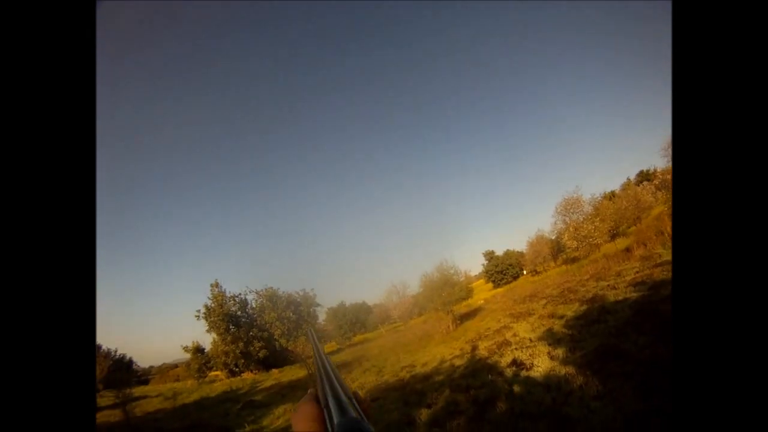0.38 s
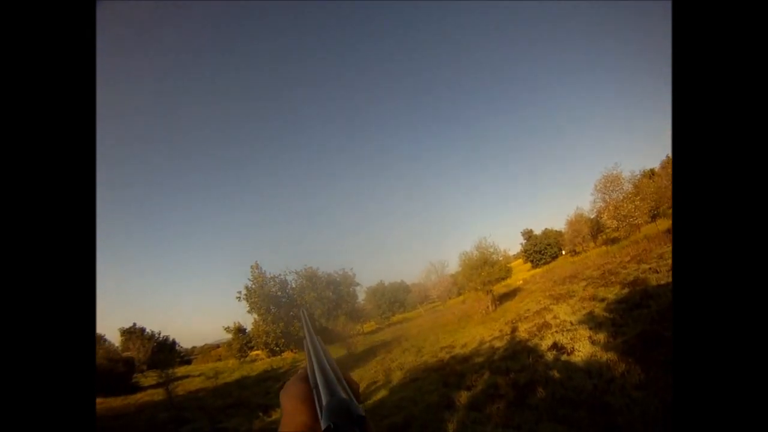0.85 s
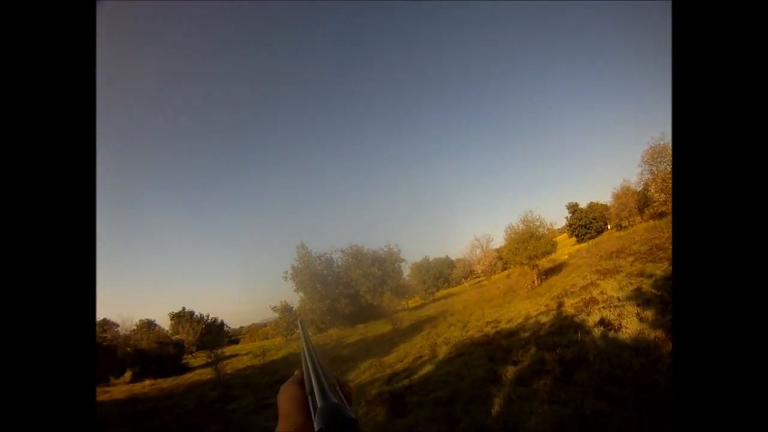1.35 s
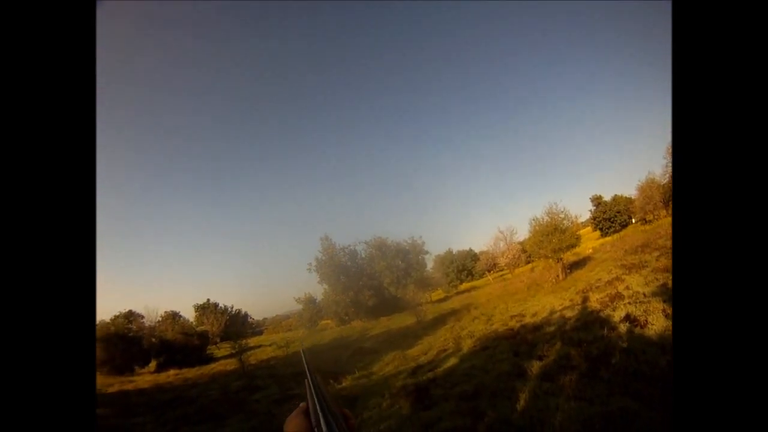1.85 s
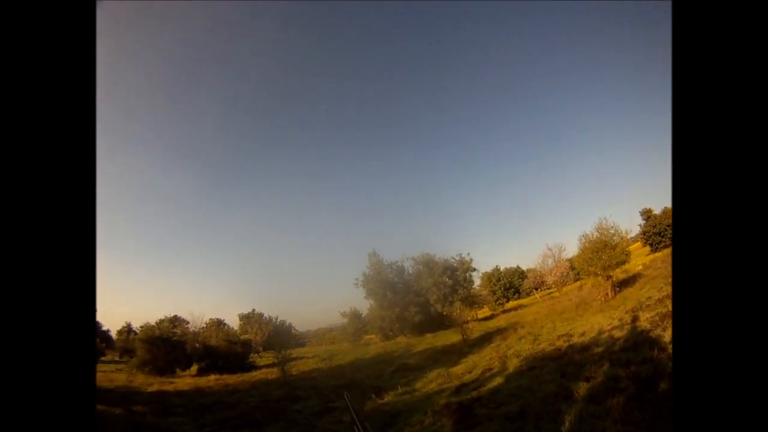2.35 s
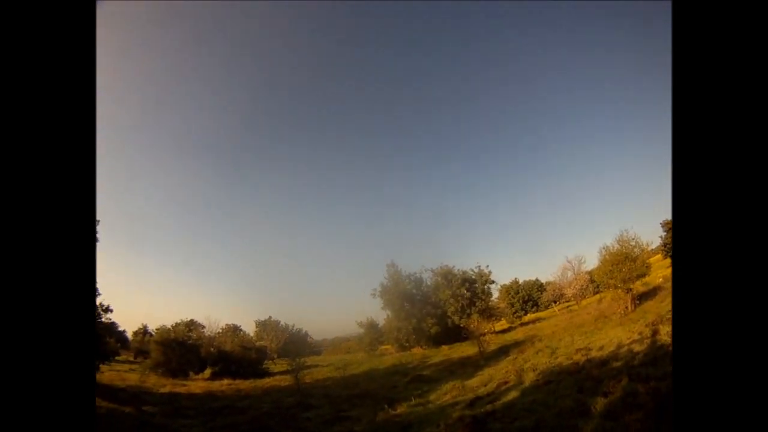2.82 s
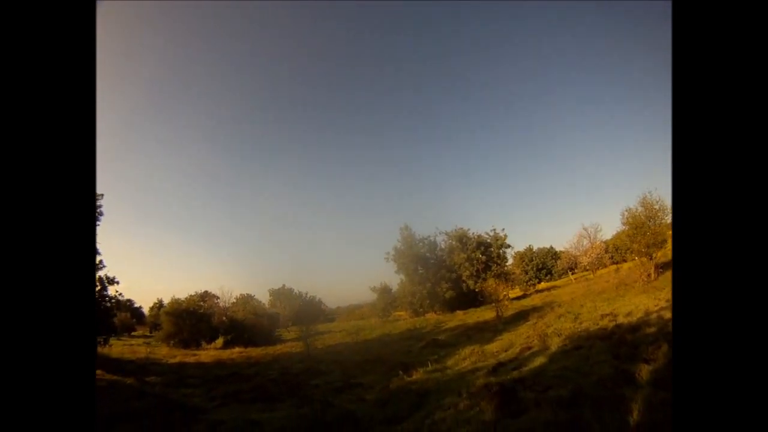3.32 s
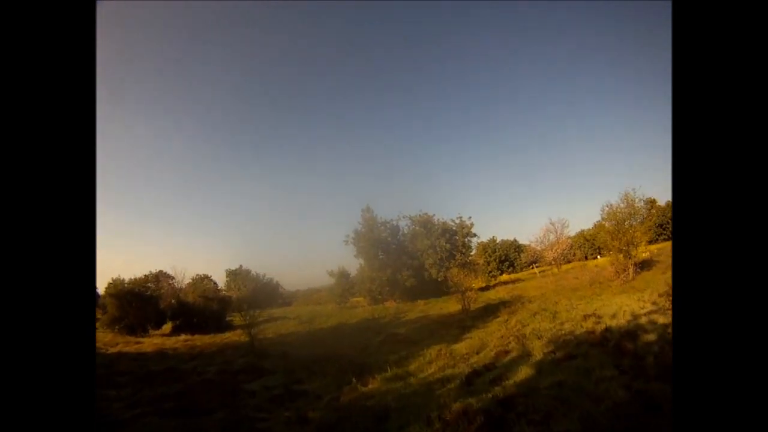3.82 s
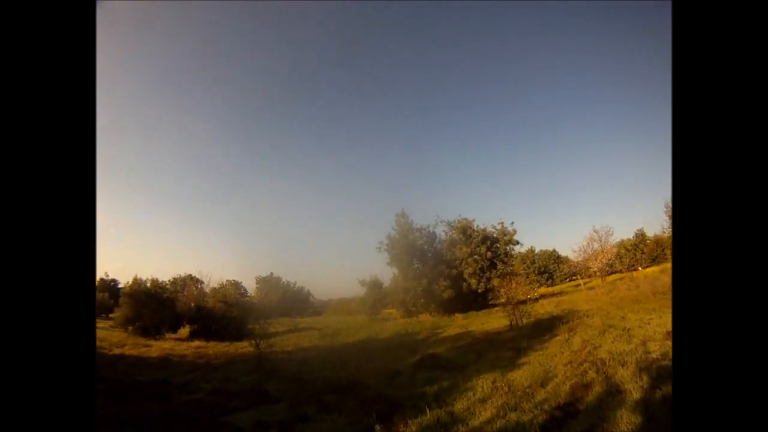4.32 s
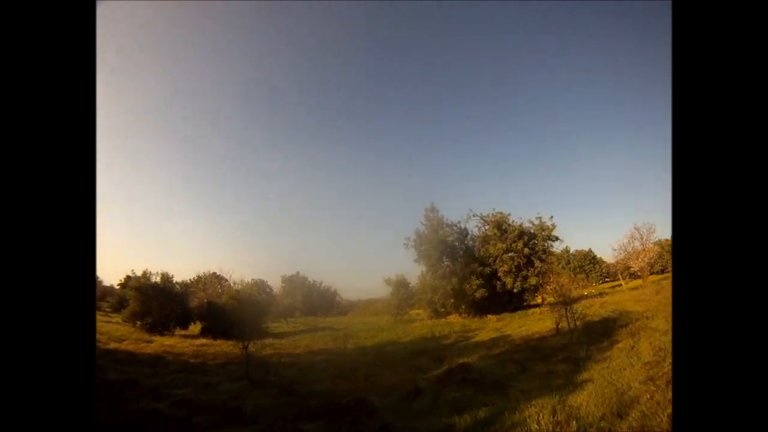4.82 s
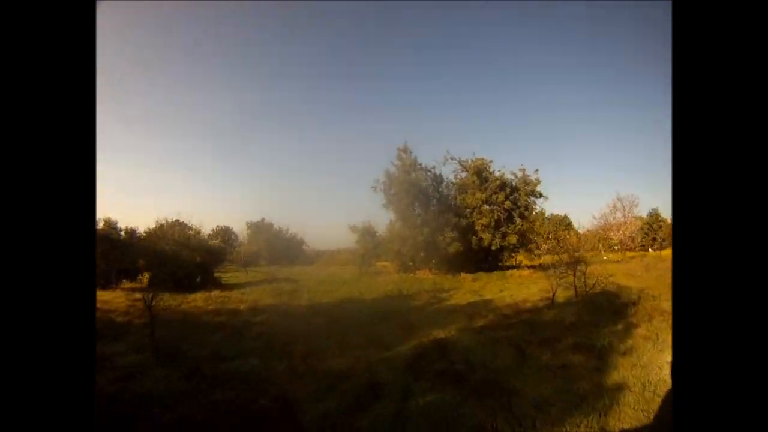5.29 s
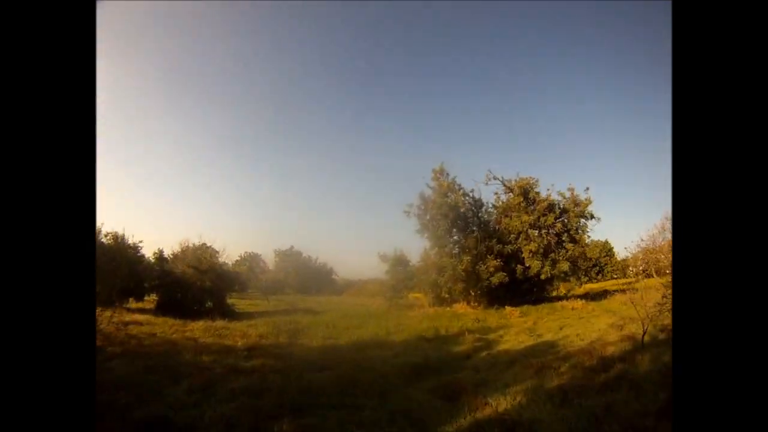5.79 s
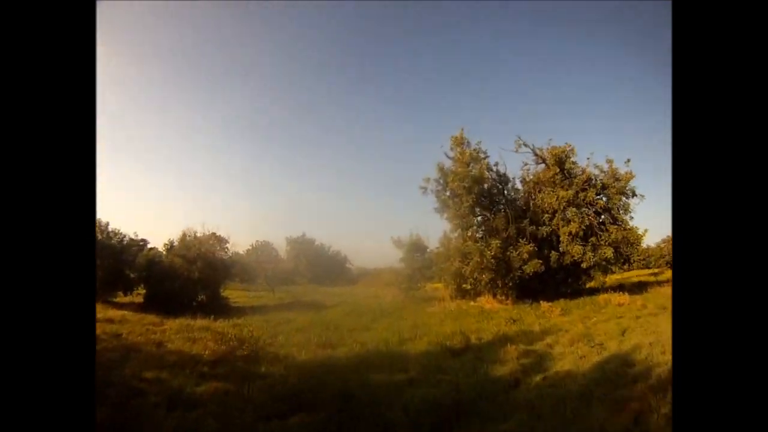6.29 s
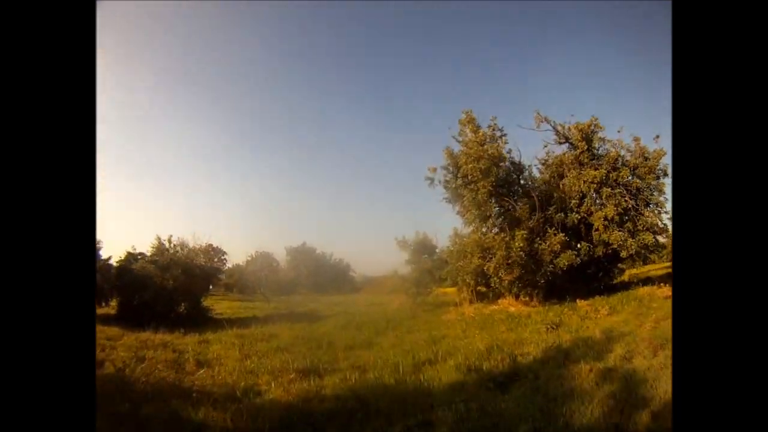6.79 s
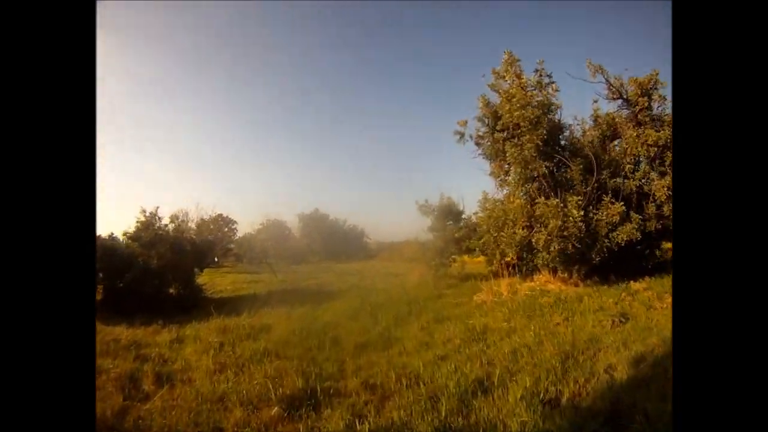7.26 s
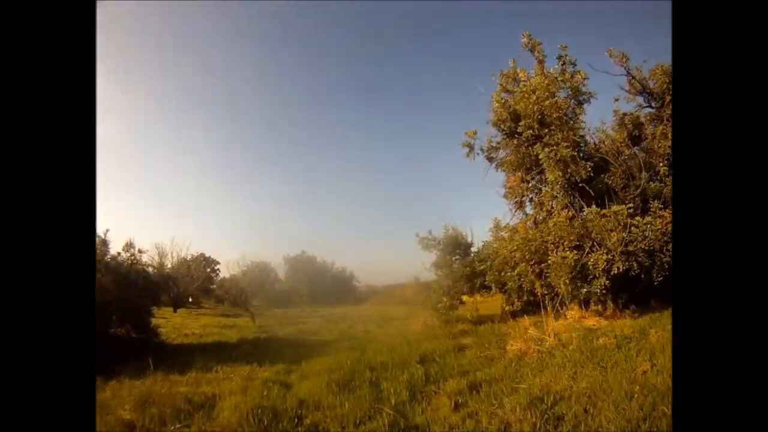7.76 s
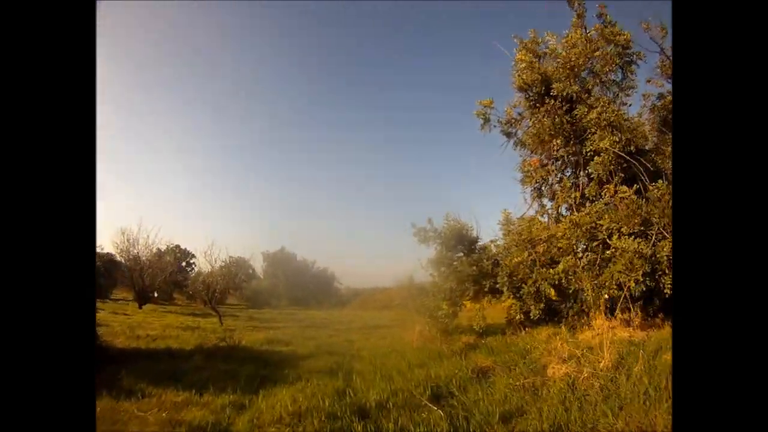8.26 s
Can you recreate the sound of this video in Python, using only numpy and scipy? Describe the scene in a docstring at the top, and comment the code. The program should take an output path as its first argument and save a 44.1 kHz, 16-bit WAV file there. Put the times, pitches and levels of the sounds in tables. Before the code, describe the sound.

A gunshot's echo tail rolls away over hiss, a distant bird whistles thinly, then heavy slowed running strides thud and swish through long grass with gear knocking.

```python
"""A run through a field, heard slowed down from a head-worn camera in a closed housing.
First the tail of a shot rolls off as scattered echoes; then a far bird whistles in thin glides of pitch.
Then the wearer runs through long grass: strides jolt the mount in deep thuds, blades swish as shaped grains,
gear knocks and ticks as noise bursts. Hiss and low rumble lie under it all to the end.
The slowed sound is held at 12000 steps a second, so it mirrors up into the treble."""
import sys
import numpy as np
from scipy import signal
from scipy.fft import rfft, irfft
from scipy.io import wavfile
from scipy.ndimage import uniform_filter1d

SR = 44100
rng = np.random.default_rng(int(sys.argv[2]) if len(sys.argv) > 2 else 0)


def store_wav(level_fs):
    """Save 16-bit WAV to argv[1]."""
    pcm = np.round(np.clip(np.atleast_2d(level_fs), -1, 1) * 32767)
    wavfile.write(sys.argv[1], SR, pcm.T.astype(np.int16))


def ratio_of_db(decibels):
    """Turn decibels (scalar or array-like) into linear amplitude factors; 0 dB maps to 1."""
    return 10 ** (np.asarray(decibels, float) / 20)


N = 380583


def rms_one(x):
    """Scales a signal to rms 1."""
    return x / np.sqrt(np.mean(x ** 2) + 1e-20)


def in_time(rows):
    """Draws straight lines between timed rows, one curve for each column after the time."""
    s, *columns = np.transpose(rows)
    return [np.interp(np.arange(N) / SR, s, column) for column in columns]


def band(x, low_hz, high_hz, order=2):
    """Butterworth band-pass."""
    sos = signal.butter(order, [low_hz, high_hz], "band", fs=SR, output="sos")
    return signal.sosfilt(sos, x + 1e-18)


def drift(rate_hz):
    """Slow random wander of rms 1: noise smoothed by two equal poles."""
    r = np.exp(-2 * np.pi * rate_hz / SR)
    wander = signal.lfilter([1], [1, -2 * r, r * r], rng.standard_normal(N + SR))
    return rms_one(wander[SR:])   # the first second only settles the filter


def ring(x, pitch_hz, width_hz):
    """One resonance applied twice, so that its skirts fall steeply."""
    r = np.exp(-np.pi * width_hz / SR)
    section = [(1 - r * r) / 2, 0, (r * r - 1) / 2, 1, -2 * r * np.cos(2 * np.pi * pitch_hz / SR), r * r]
    return signal.sosfilt([section, section], x + 1e-18)


def grains(per_s, spread_db):
    """Clicks at random moments, of very unequal size."""
    sizes = ratio_of_db(spread_db * np.minimum(rng.exponential(1, N), 5)) * rng.standard_normal(N)
    return sizes * (rng.random(N) < per_s / SR)


def bursts(rows, decay_s):
    """A puff of noise per (start_s, level_db) row, fading exponentially; energy 1 before its level."""
    out, tau = np.zeros(N + 600), np.arange(600) / SR
    envelope = np.minimum(tau / 0.0013, 1) * np.exp(-tau / decay_s)
    for (start_s, level_db), noise in zip(rows, rng.standard_normal((len(rows), 600))):
        puff = noise * envelope
        start = round(start_s * SR)
        out[start:start + 600] += ratio_of_db(level_db) * puff / np.linalg.norm(puff)
    return out[:N]


# resonances of the air space before the microphone: pitch_hz [Hz], width_hz [Hz], level_db [dB]
HOUSING_RINGS = [(875, 210, -33.5), (1157, 242, -2), (1966, 423, 0.5), (2430, 56, -43), (3707, 500, 0),
                 (4700, 750, -13)]


def resonate(x, bed_db, low_hz, high_hz):
    """The housing resonances over a broad band-passed bed."""
    bed = ratio_of_db(bed_db) * band(x, low_hz, high_hz)
    return bed + sum(ratio_of_db(level_db) * ring(x, pitch_hz, width_hz) for pitch_hz, width_hz, level_db in HOUSING_RINGS)


# spectrum shape of the hiss: pitch_hz [Hz], level_db [relative dB per Hz]
HISS_SHAPE = [(90, 3), (250, 0), (400, -6), (800, -9.5), (1500, -13.5), (2100, -12), (3000, -16),
              (4000, -15.5), (5300, -18), (5600, -24), (6000, -26), (7000, -58)]


def hiss():
    """Circuit and air noise shared by both channels, with a fainter hiss that is opposite in the two channels."""
    mid_db, side_db = -60.5, -12.5   # side against the mid, before its band-pass
    hz, (points_hz, points_db) = np.fft.rfftfreq(N, 1 / SR), np.transpose(HISS_SHAPE)
    shape = ratio_of_db(np.interp(np.log(hz + 1), np.log(points_hz), points_db))
    mid, side = irfft(rfft(rng.standard_normal((2, N))) * shape, N)
    side = band(side, 1600, 12000, order=1) * ratio_of_db(side_db)
    return ratio_of_db(mid_db) * (mid + side * [[1], [-1]]) / np.std(mid)


def rumble():
    """Wind and the shot's roll at rest; the mount sways with the pace and wobbles on after springy jolts."""
    wind_db, shot_db, shot_fall_db_per_s = -72.5, -41.5, 14.5
    sway_db, sway_pace_db, sway_follows = -42.5, -55, 0.71   # sway level at this pace; share of the pace
    wobble_db, wobble_s = -13.5, 0.062   # against jolt times rebound; decay time of the power
    tau, kicks = np.arange(N) / SR, np.zeros(N)
    for start_s, level_db, _, rebound in STRIDE_JOLTS:
        kicks[round(start_s * SR)] = (rebound * ratio_of_db(level_db + wobble_db)) ** 2
    wobble_power = signal.lfilter([1], [1, -np.exp(-1 / (wobble_s * SR))], kicks + 1e-18)
    pace_db = in_time(RUN_PACE)[0]
    sway = np.sqrt(ratio_of_db(sway_db + sway_follows * (pace_db - sway_pace_db)) ** 2 + wobble_power)
    rest = np.hypot(ratio_of_db(wind_db), ratio_of_db(shot_db - shot_fall_db_per_s * tau))
    deep, swing = rng.standard_normal((2, N))
    resting = rest * rms_one(band(deep, 16.4, 44.0, order=3))
    swaying = sway * rms_one(band(swing, 17.7, 51.7, order=3))
    return ratio_of_db(2.17 * drift(5.7)) * (resting + swaying)


# arched notes of the far bird: start_s [s], length_s [s], top_hz [Hz],
# level_db [dB rms at the foot of the glide], rising [share of the note]
BIRD_NOTES = [(1.417, .112, 2800, -62, .5), (1.585, .125, 2850, -74, .5), (2.255, .13, 2330, -65, .8)]


def bird():
    """Thin gliding whistles, broken up by the air on their long way."""
    foot_hz, top_loss_db_per_khz, edge_s = 1940, 8, 0.0086
    break_hz, break_width_hz, break_db = 2530, 130, -14   # the whistle fades while passing this pitch, where the housing lets little through
    out, tau, flicker_db = np.zeros(N), np.arange(N) / SR, 3.0 * drift(40)
    wobble = 1 + 0.02 * drift(80)
    for start_s, length_s, top_hz, level_db, rising in BIRD_NOTES:
        end_s = start_s + length_s
        height = np.sin(np.pi * np.interp(tau, [start_s, start_s + rising * length_s, end_s], [0, 0.5, 1]))
        edges = np.clip(np.minimum(tau - start_s, end_s - tau) / edge_s, 0, 1) ** 2
        climb_hz = (top_hz - foot_hz) * height
        pitch_hz = foot_hz + climb_hz
        broken_db = break_db * np.exp(-((pitch_hz - break_hz) / break_width_hz) ** 2)
        level = edges * ratio_of_db(level_db - top_loss_db_per_khz * climb_hz / 1000 + broken_db + flicker_db)
        out += level * np.sqrt(2) * np.sin(2 * np.pi * np.cumsum(pitch_hz * wobble) / SR)
    return out


# distinct slaps off the nearest trees: start_s [s], level_db [dB, before the shared gain and the rings]
SHOT_SLAPS = [(0.05, -26), (0.068, -42), (0.1, -31), (0.15, -19), (0.22, -25), (0.27, -36), (0.4, -31),
              (0.53, -43), (0.8, -46)]
# bands in which the tail rings: pitch_hz [Hz], width_hz [Hz], level_db [dB],
# fade_db_per_s [dB per s, on top of the echoes' own fall; negative fades slower]
SHOT_RINGS = [(840, 630, -9, -3), (1200, 460, -9, -5.5), (2127, 475, 2.5, -0.7), (2370, 450, -4, 34),
              (3730, 350, -6, 9), (4800, 700, -9.5, 25)]


def shot_tail():
    """Scattered echoes merge into a lumpy wash, the nearest trees slap; each band fades at its own pace."""
    # the wash swells as farther trees answer, holds, then dies away
    start_db, full_db, rise_s, hold_s, fall_db_per_s = -29, -25.5, 0.12, 0.077, 44.5
    tau = np.arange(N) / SR
    swell_db = np.interp(tau, [0, rise_s], [start_db, full_db])
    level_db = swell_db - fall_db_per_s * np.maximum(tau - rise_s - hold_s, 0)
    scattered = rms_one(grains(14000, 0.51)) * ratio_of_db(level_db + 1.7 * drift(40))
    echoes = scattered + ratio_of_db(21.5) * bursts(SHOT_SLAPS, 0.01)
    wash = ratio_of_db(-25 - 20.5 * tau) * band(echoes, 310, 5000)
    for pitch_hz, width_hz, ring_db, fade_db_per_s in SHOT_RINGS:
        flutter_db = (4.5 if pitch_hz < 1600 else 1.0) * drift(25)   # low echoes come back lumpiest
        wash += ratio_of_db(ring_db - fade_db_per_s * tau + flutter_db) * ring(echoes, pitch_hz, width_hz)
    blast = ratio_of_db(-12) * np.exp(-tau / 0.0081) * np.cos(2 * np.pi * 26 * tau)   # last swing of the blast wave
    return wash + blast


def jolt_fizz(thuds):
    """A faint dull fizz, opposite in the two channels, rides on the sharpest thuds only."""
    power = uniform_filter1d(band(thuds, 71, 350) ** 2, size=1500)
    fizz = band(rng.standard_normal(N), 30, 1500, order=1)
    return ratio_of_db(-45) * fizz * np.clip(power / 0.0033 - 0.4, 0, 1) * [[1], [-1]]


def rattle(thuds):
    """The mount has loose play: it rattles low and rough in step with the swing that shakes it."""
    shaking = np.sqrt(np.abs(uniform_filter1d(thuds ** 2, size=900)))
    return ratio_of_db(-36.5) * shaking * rms_one(band(grains(900, 2.0), 140, 400))


# gear knocks: start_s [s], level_db [dB, before gain and filters], body_db [low body, dB against level_db]
GEAR_KNOCKS = [(3.453, -36, -22), (3.864, -24.5, -3), (4.081, -19, -6), (4.207, -25.5, -20),
               (4.379, -25.5, -4), (4.586, -25.5, 1.5), (4.623, -26.5, -11), (4.77, -21.5, 0.5),
               (4.9, -22, 6), (4.943, -18, -14), (5.145, -15, 2), (5.223, -29, 5), (5.44, -25, -6),
               (5.493, -30.5, -2), (5.845, -21, -7), (5.949, -35, -20), (6.036, -38, -24),
               (6.146, -28, -14), (6.233, -27, 2.5), (6.29, -35, 7), (6.49, -16.5, -0.5), (6.713, -41, -14),
               (6.791, -33, -20), (6.849, -23.5, -4), (7.175, -25, -12), (7.383, -27, 6), (7.446, -30, 5),
               (7.566, -15.5, -10), (7.627, -22.5, 0.5), (7.67, -27, -6), (7.891, -31.5, -19),
               (8.1, -41, -10), (8.23, -35, -10), (8.27, -23.5, -8), (8.33, -25.5, -7), (8.385, -17.5, 1),
               (8.427, -32, -22), (8.617, -20.5, -12)]
# thin bright ticks: start_s [s], level_db [dB, before gain and filter]
GEAR_TICKS = [(3.423, -38.5), (3.463, -42), (3.8206, -42), (3.8769, -33), (3.909, -39), (4.1037, -34.5),
              (4.1515, -35.5), (4.2086, -29.5), (4.2296, -45), (4.2775, -40.5), (4.4332, -49),
              (4.5718, -37.5), (4.591, -34), (4.604, -41), (4.6284, -34), (4.7948, -42), (4.91, -37),
              (4.93, -41), (4.955, -37), (4.9704, -39), (5.0095, -37), (5.161, -39), (5.2064, -35.5),
              (5.23, -38), (5.2618, -41), (5.2887, -41), (5.2988, -40.5), (5.469, -42.5), (5.6225, -42),
              (5.6537, -24), (5.6807, -47), (5.7856, -44), (5.9505, -34), (6.038, -32), (6.1333, -47),
              (6.1832, -41.5), (6.3154, -31.5), (6.3528, -38), (6.367, -38), (6.4324, -43.5), (6.5175, -43),
              (6.6, -45), (6.724, -40.5), (6.8026, -36.5), (6.964, -44), (6.981, -44), (6.996, -44),
              (7.0647, -49), (7.119, -41), (7.3915, -37.5), (7.5306, -39.5), (7.6005, -40), (7.708, -35),
              (7.726, -32.5), (7.742, -40), (7.7826, -51), (7.8225, -40), (7.89, -50), (8.1057, -32.5),
              (8.1831, -34.5), (8.075, -51), (8.1592, -48), (8.283, -36), (8.3857, -38.5), (8.4311, -48),
              (8.52, -46), (8.578, -45)]


def gear():
    """Dull knocks ring the low housing resonances, trailed by a rustle; ticks hold only the top."""
    start_s, level_db, body_db = np.transpose(GEAR_KNOCKS)
    hits = np.c_[start_s, level_db]
    struck = bursts(hits, 0.0018) + ratio_of_db(-8.5) * bursts(hits, 0.01)   # the slower burst is the rustle
    knocks = band(resonate(struck, -4, 900, 2700), 400, 2750, order=8)
    body = band(bursts(np.c_[start_s, level_db + body_db], 0.003), 150, 600)
    ticks = band(bursts(GEAR_TICKS, 0.002), 2600, 5350, order=4)
    return ratio_of_db(21.0) * knocks + ratio_of_db(18.5) * body + ratio_of_db(22.5) * ticks


# pace of the run, as the steady brushing of the grass: start_s [s], level_db [dB, before clumping]
RUN_PACE = [(2.0, -86), (2.4, -74.5), (2.75, -64), (3.3, -63), (3.75, -63.5), (4.1, -70), (4.5, -63),
            (5.05, -52.5), (5.34, -58), (5.85, -63.5), (6.05, -58), (6.67, -54.5), (7.2, -60), (7.42, -69),
            (7.62, -53.5), (8.0, -55), (8.04, -63), (8.5, -65), (8.63, -50.5)]
# single sweeps of leg and cloth: center_s [s], level_db [dB, before clumping],
# length_ms [ms between the points where the power is down to 1/e]
LEG_SWEEPS = [(2.822, -55.5, 107), (3.056, -60, 50), (3.144, -49.5, 15), (3.278, -49.5, 42),
              (3.425, -53.5, 20), (3.465, -56.5, 30), (3.836, -44, 27), (3.872, -45, 23), (3.913, -46, 17),
              (4.02, -52.5, 37), (4.166, -47, 146), (4.255, -50.5, 46), (4.41, -55.5, 70), (4.484, -47, 43),
              (4.59, -41.5, 28), (4.627, -47, 14), (4.861, -43.5, 17), (4.914, -31, 21), (5.003, -42.5, 57),
              (5.159, -44, 41), (5.232, -48.5, 56), (5.292, -51, 20), (5.546, -47, 43), (5.644, -44, 29),
              (5.868, -51.5, 92), (5.981, -47.5, 54), (6.039, -40, 15), (6.149, -50, 7.1),
              (6.248, -41.5, 27), (6.316, -39.5, 25), (6.66, -48.5, 33), (6.72, -39.5, 11),
              (6.825, -52.5, 40), (7.02, -52.5, 67), (7.269, -56, 42), (7.395, -41.5, 18.4),
              (7.498, -46, 99), (7.742, -42, 81), (7.946, -59, 79), (8.106, -42, 19.5), (8.182, -51, 26),
              (8.276, -53.5, 78), (8.335, -58, 40), (8.379, -42, 30), (8.478, -53.5, 15), (8.518, -59, 17)]


def grass():
    """Blades brush past by the thousand, stalks crack and tick by chance; sweeps swell over a steady bed."""
    dry_db, crackle_db, tick_db = -15, -12.5, -23.5   # against the swish
    power, tau = ratio_of_db(in_time(RUN_PACE)[0]) ** 2, np.arange(N) / SR
    for center_s, level_db, length_ms in LEG_SWEEPS:
        near = slice(round((center_s - 0.2) * SR), round((center_s + 0.2) * SR))
        distance = np.abs((tau[near] - center_s) / (length_ms / 2000))
        power[near] += ratio_of_db(level_db) ** 2 * np.exp(-distance ** 2.18)
    clumps = ratio_of_db(1.5 * drift(25) + 2 * drift(120))
    swish = band(resonate(grains(3000, 2.08), -2.5, 967, 2530), 236, 2510, order=3)
    dry_blades = band(resonate(grains(4000, 3.0), -14, 2800, 5300), 2900, 5450, order=3)
    crackle = band(resonate(grains(120, 4.2), 0.0, 360, 2400), 260, 1860, order=3)
    ticks = band(grains(70, 2.6), 2540, 4760, order=4)
    brushing = rms_one(swish) + ratio_of_db(dry_db + 2 * drift(25)) * rms_one(dry_blades)
    stalks = ratio_of_db(crackle_db) * rms_one(crackle) + ratio_of_db(tick_db) * rms_one(ticks)
    return np.sqrt(power) * (clumps * brushing + stalks)


# strides jolting the mount: start_s [s, center of the push], level_db [dB, push alone], # width_ms [ms, scales
# the push and lift, sets when the swing starts and lengthens its period], rebound [swing factor]
STRIDE_JOLTS = [(2.665, -32.5, 7.3, 0.65), (2.7075, -35.5, 7.9, 0.6), (3.1405, -30, 14, 0.6),
                (3.464, -28.5, 8.9, 0.92), (3.8365, -20, 7.6, .65), (3.8763, -9, 7.1, 0.27),
                (4.172, -22, 11.2, 1.6), (4.212, -18, 7.9, 0.72), (4.2798, -20, 8.7, 0.48),
                (4.3034, -24.5, 8.3, 0.52), (4.593, -7, 5.9, 0.34), (4.6292, -10.5, 6.6, 0.2),
                (4.662, -17.5, 9, 0.32), (4.6806, -24, 10.3, 0.43), (4.9024, -10.5, 5, .01),
                (4.908, -15.5, 3.1, 0.75), (4.9152, -8.5, 6.5, 0.35), (4.9425, -4.5, 4.75, 0.17),
                (4.977, -16.5, 8.9, 0.48), (4.994, -15.5, 4.2, 0.28), (5.0057, -21, 2.17, 1.08),
                (5.0158, -17.5, 3.8, 0.079), (5.0225, -18.5, 3.5, .03), (5.248, -13.5, 9.2, 0.79),
                (5.2857, -21.5, 6.4, 1.5), (5.338, -20.5, 9.9, 0.31), (5.6553, 0.8, 4.34, 0.097),
                (5.907, -20.5, 9.5, 0.64), (5.9477, -23, 15.4, 0.36), (6.0408, -8, 6.3, 0.34),
                (6.299, -21.5, 7.7, 1.6), (6.3552, -15.5, 7.6, 0.71), (6.575, -16.5, 11, 1.04),
                (6.7235, -7.5, 4.86, 0.29), (6.9495, -15, 9.5, 0.27), (6.978, -13.5, 8.8, 0.24),
                (7.057, -26, 11.3, 0.86), (7.3913, -7.6, 7.9, 0.36), (7.4333, -24, 8.1, .61),
                (7.497, -18.5, 7.5, 0.71), (7.525, -21.5, 11, 0.29), (7.6032, -23, 11, 1.05),
                (7.6853, -12.5, 10, 0.35), (7.7294, -12, 7.8, 0.35), (7.7884, -25, 7.2, 0.87),
                (7.813, -25.5, 11, 0.37), (8.107, -5.5, 5.37, 0.23), (8.137, -13.5, 8.1, 0.36),
                (8.1768, -23.5, 8.8, 0.79), (8.3855, -2.5, 4.9, 0.14), (8.3921, -2, 2.85, 0.11),
                (8.4313, -21, 5, 0.5)]
# sharp upward flicks of the mount: center_s [s], level_db [dB peak], width_ms [ms, scales the bell curve]
MOUNT_SNAPS = [(4.925, -14, 6.2), (7.404, -11, 5.8), (7.706, -11, 7.2), (7.740, -16, 5.9),
               (8.379, -19, 8.8), (8.396, -17, 5)]


def mount():
    """Each stride pulls the membrane down after a small lift; the mount swings back and settles."""
    out, tau = np.zeros(N + SR), np.arange(-2000, 6000) / SR
    for start_s, level_db, width_ms, rebound in STRIDE_JOLTS:
        width = width_ms / 1000
        push = np.exp(-(tau / (0.51 * width)) ** 2)
        lift = 0.19 * np.exp(-((tau + 1.72 * width) / (1.07 * width)) ** 2)
        late = (tau - 0.7 * width) / (0.2 * width)
        after = 0.2 * width * np.logaddexp(0, late)   # the swing sets in smoothly
        swing = np.sin(2 * np.pi * after / (3.44 * width + 0.0045)) * np.exp(-after / 0.0097)
        jolt = lift + 3.4 * rebound * swing - push
        at = round(start_s * SR)
        out[at - 2000:at + 6000] += ratio_of_db(level_db) * jolt
    for center_s, level_db, width_ms in MOUNT_SNAPS:
        at = round(center_s * SR)
        out[at - 2000:at + 6000] += ratio_of_db(level_db) * np.exp(-(tau / (0.00041 * width_ms)) ** 2)
    return out[:N]


def scene():
    """All but the hiss and the fizz reaches both channels alike."""
    thuds = mount() + rumble()
    shared = shot_tail() + bird() + grass() + gear() + thuds + rattle(thuds)
    return shared + hiss() + jolt_fizz(thuds)


def top_cut(x):
    """Nothing passes above the cut-off."""
    return signal.sosfilt(signal.butter(12, 15660, fs=SR, output="sos"), x)


def record(dry):
    """Peaks rounded; sampled at 12000 a second, each step held four times, brought to SR; top cut."""
    rounded = 1.2 * np.tanh(dry / 1.2)
    steps = signal.resample_poly(rounded, 40, 147, axis=1, window=("kaiser", 3.0))   # soft filter, some folding
    held = np.repeat(steps, 4, axis=1)   # holding mirrors the sound up the treble
    held = signal.resample_poly(held, 147, 160, axis=1)[:, :N]
    finished = signal.sosfilt(signal.butter(16, 15100, fs=SR, output="sos"), held)
    return top_cut(finished)


dry = scene()
out = record(dry)
store_wav(out)
```